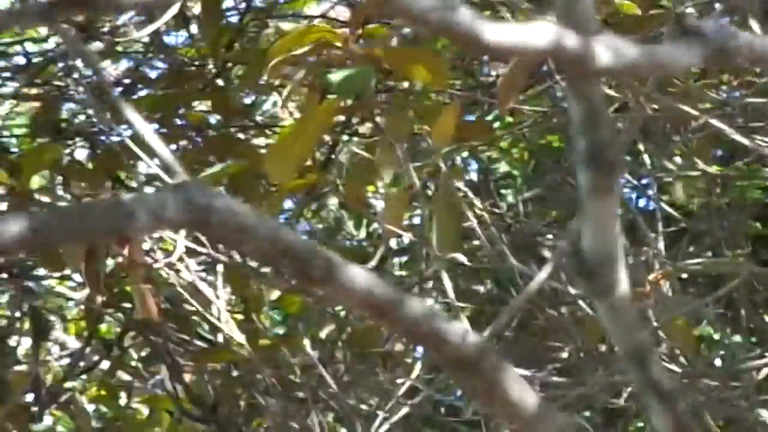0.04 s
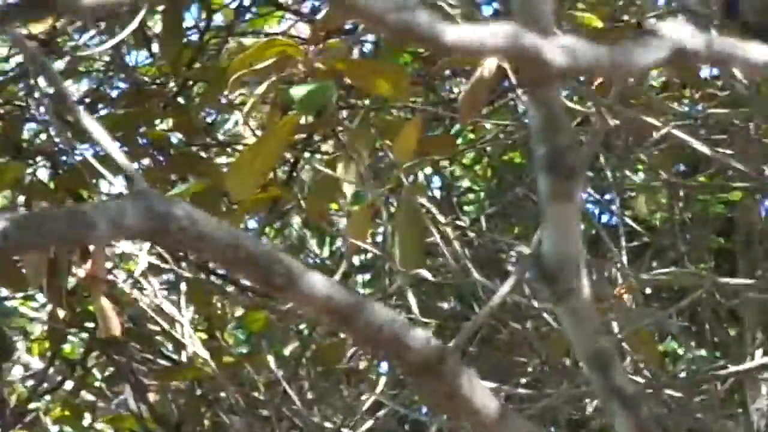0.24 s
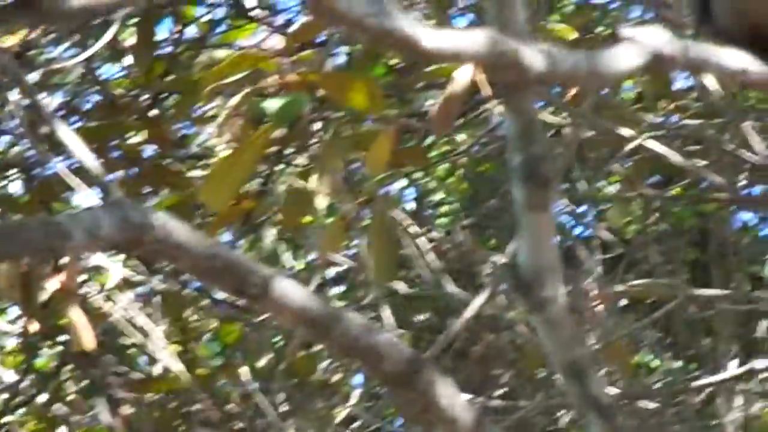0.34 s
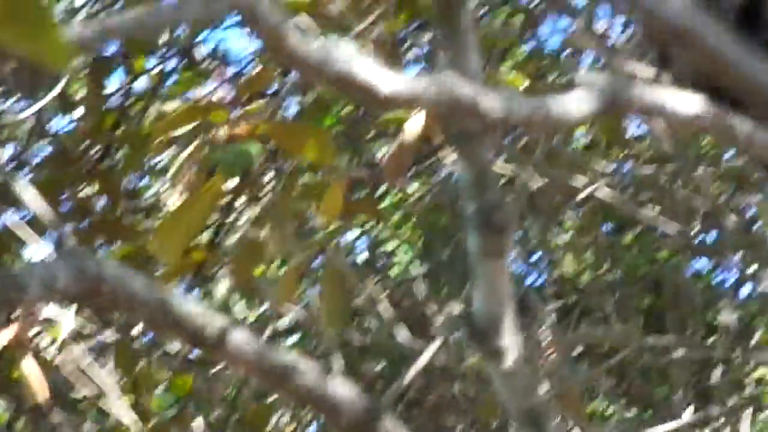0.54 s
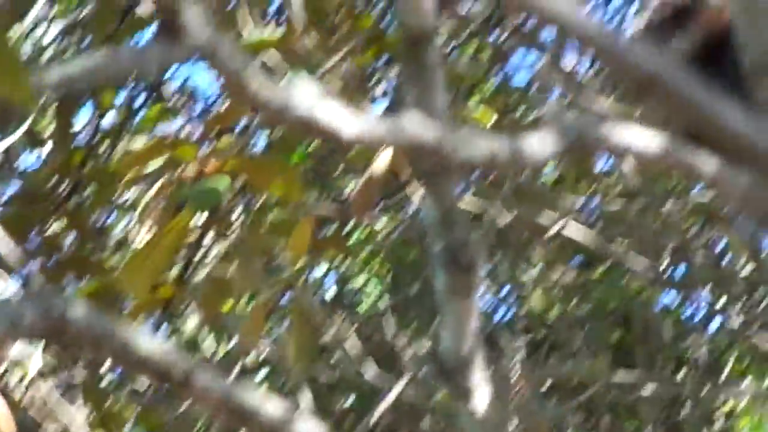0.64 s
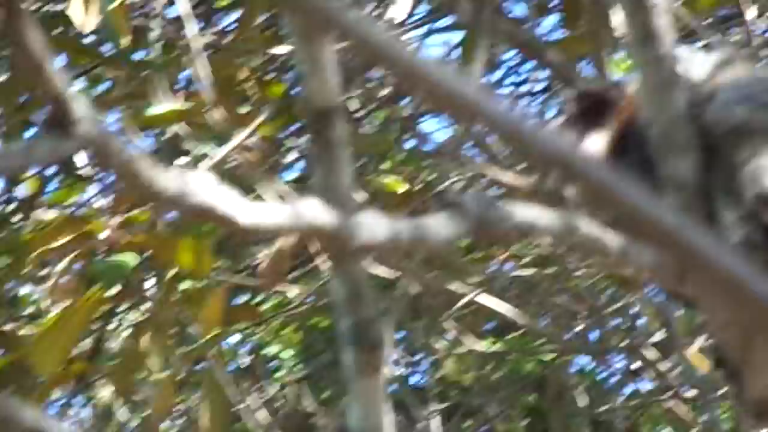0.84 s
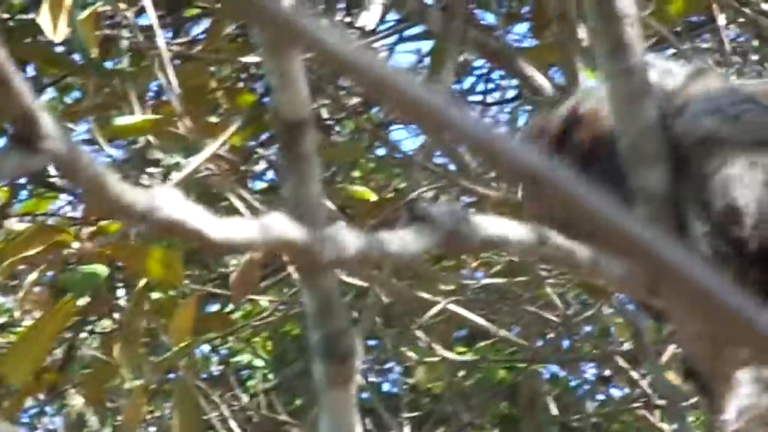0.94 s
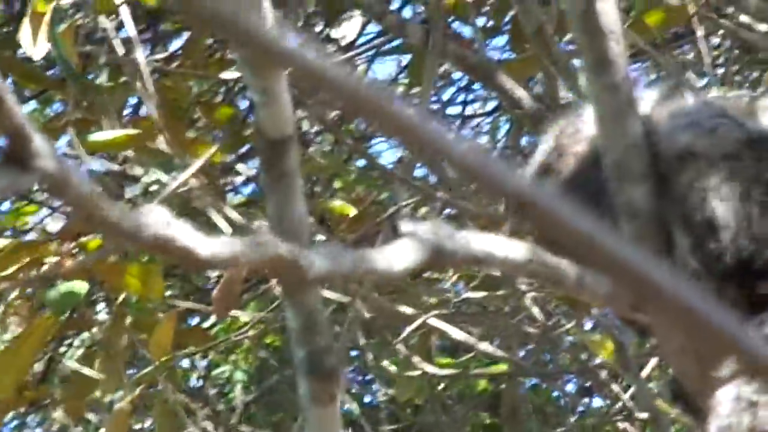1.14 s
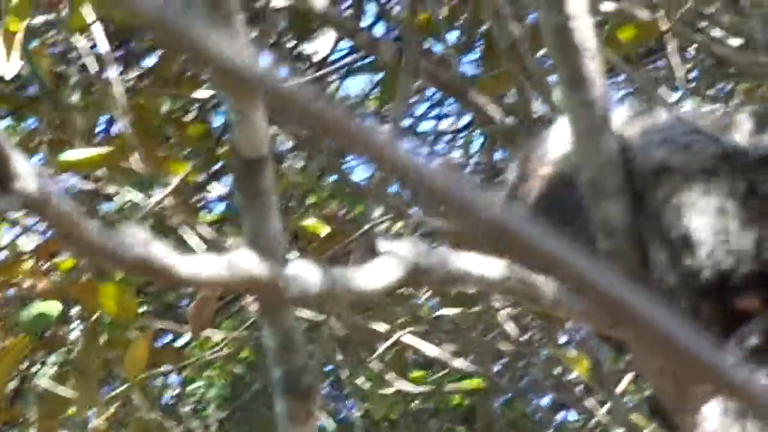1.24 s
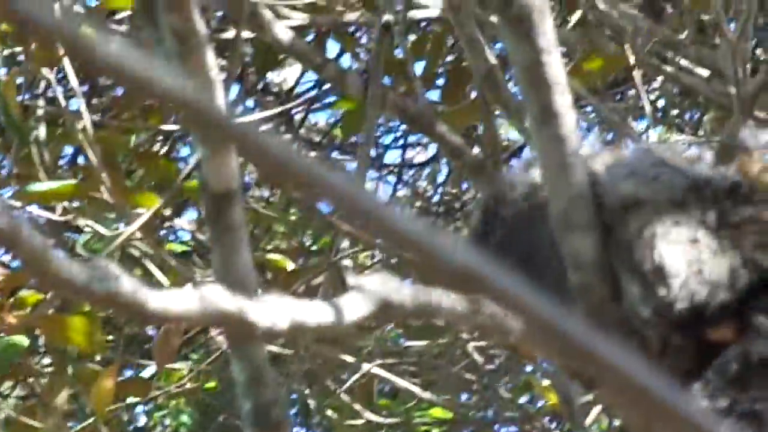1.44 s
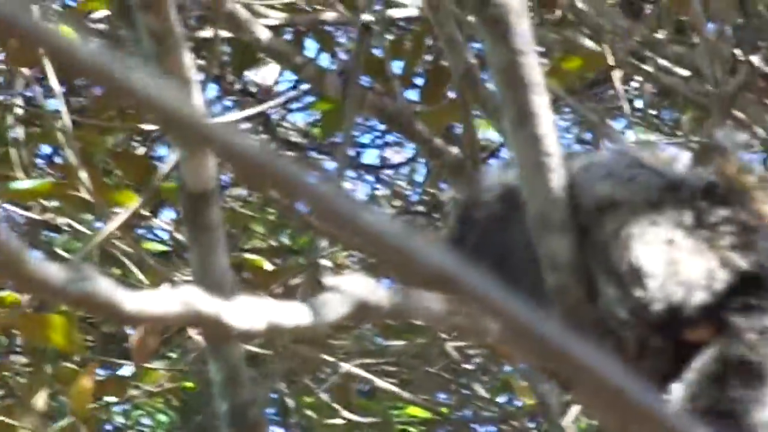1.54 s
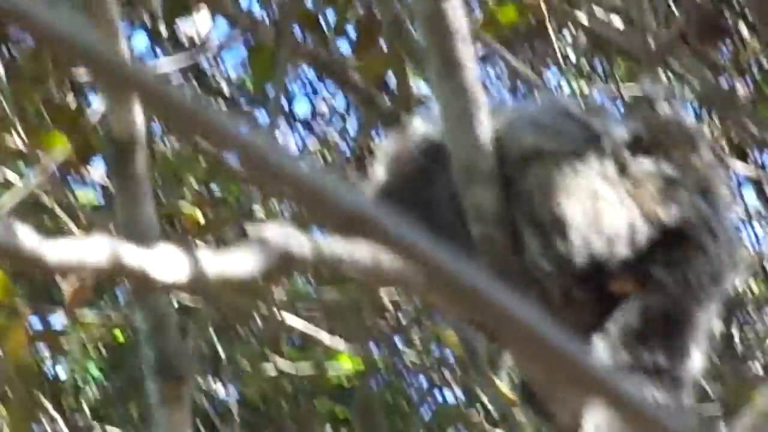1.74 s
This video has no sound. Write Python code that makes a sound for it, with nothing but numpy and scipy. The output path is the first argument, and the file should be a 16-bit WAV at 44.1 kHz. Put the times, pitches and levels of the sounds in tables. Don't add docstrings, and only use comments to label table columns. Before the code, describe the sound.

Two very short, sharp falling chirps from a small monkey in a tree, over quiet hiss

```python
import sys
import numpy as np
from scipy import signal
from scipy.fft import rfft, irfft
from scipy.io import wavfile
from scipy.ndimage import uniform_filter1d

SR = 44100
rng = np.random.default_rng(int(sys.argv[2]) if len(sys.argv) > 2 else 0)


def volts(x):
    e = np.asarray(x, float) / 20
    return 10 ** e


def master_out(mix):
    frames = np.transpose(np.atleast_2d(mix))
    ceiling = np.clip(frames, -1, 1)
    pcm = np.round(ceiling * 32767).astype(np.int16)
    wavfile.write(sys.argv[1], SR, pcm)


N = 79380
TIME = np.arange(N) / SR
BIN_HZ = np.arange(N // 2 + 1) * SR / N


def rms_one(x):
    return x / np.sqrt(np.mean(x ** 2) + 1e-20)


def at_hz(points, hz):
    point_hz, point_db = np.transpose(points)
    return np.interp(np.log(hz + 1), np.log(point_hz), point_db)


def drift(rate_hz):
    r = np.exp(-2 * np.pi * rate_hz / SR)
    slow = signal.lfilter([1], [1, -2 * r, r * r], rng.standard_normal(N + SR))
    return rms_one(slow[SR:])


def resonate(x, hz, width_hz):
    r = np.exp(-np.pi * width_hz / SR)
    zeros = np.array([1, 0, -1]) * (1 - r * r) / 2
    return signal.lfilter(zeros, [1, -2 * r * np.cos(2 * np.pi * hz / SR), r * r], x)


def resonate_twice(x, hz, width_hz):
    return resonate(resonate(x, hz, width_hz), hz, width_hz)


def ringing_noise(hz, width_hz):
    return rms_one(resonate_twice(rng.standard_normal(N), hz, width_hz))


def swell(centre_s, length_s):
    return np.exp(-((TIME - centre_s) / length_s) ** 2)


# f/Hz, level/dB per Hz
FLOOR_SPECTRUM = [(26, -23), (45, -9.5), (108, -10), (870, -1), (959, -5.5), (1350, -5), (4430, -13.5),
                  (12600, -16), (14900, -16)]


def hiss_and_rumble():
    level_db, flicker_db = -55.5, -0.01
    spectrum = rfft(rng.standard_normal(N)) * volts(at_hz(FLOOR_SPECTRUM, BIN_HZ))
    place = np.clip(2 * np.log2(BIN_HZ / 20 + 1e-9), 0, 19)
    out = 0
    for k in range(20):
        band = np.clip(1 - abs(place - k), 0, 1)
        out = out + irfft(spectrum * band, N) * volts(flicker_db * drift(18))
    return volts(level_db) * rms_one(out)


# f/Hz, bandwidth/Hz, level/dB, flicker/dB
HUM_MODES = [
    (550, 165, -72.5, -2.5),
    (734, 230, -81, 3.5),
    (900, 170, -94.5, 4),
    (1397, 116, -67, 1),
]


def hum():
    out = 0
    for hz, width_hz, db, flicker_db in HUM_MODES:
        out = out + volts(db + flicker_db * drift(15)) * ringing_noise(hz, width_hz)
    return out


# t/s, length/s, f/Hz, level/dB
HUM_SWELLS = [(0.068, 0.049, 1390, -54.5), (.03, 0.028, 1284, -58), (0.09, 0.15, 550, -65),
              (0.13, 0.011, 680, -58.5), (.42, 0.021, 1397, -73.5), (0.467, 0.057, 540, -62.5),
              (0.662, 0.027, 562, -60.5), (1.423, 0.049, 900, -58), (1.596, .015, 913, -58)]


def hum_swells():
    width_hz = 62
    return sum(volts(db) * swell(s, length_s) * ringing_noise(hz, width_hz)
               for s, length_s, hz, db in HUM_SWELLS)


# f/Hz, rms level/dB
WHINE_TONES = [
    (12258, -71.5),
    (12290, -81.5),
]


def whine():
    out = 0
    for hz, db in WHINE_TONES:
        level = volts(db - 2.5 + 3 * drift(12))
        out = out + level * np.sqrt(2) * np.sin(2 * np.pi * hz * TIME)
    return out


# t/s, level of a patch/dB, number of patches
SIDE_PATCHES = [(.04, -73, 3), (.18, -71, 2), (.215, -70, 0), (.275, -72, 9), (.852, -74, 1), (.9, -67, 1),
                (1.038, -72, 2), (1.085, -84, 6), (1.2, -73, 2), (1.457, -73, 3)]


def side_patches():
    length_s, width_hz = .016, 1500
    noise, out = rfft(rng.standard_normal(N)), 0
    for s, db, patches in SIDE_PATCHES:
        if patches == 0:
            bands = [0]
        elif patches < 6:
            bands = 3 + rng.permutation(7)[:patches]
        else:
            bands = np.arange(10)
        patch = rms_one(irfft(noise * np.isin(BIN_HZ // width_hz, bands), N))
        envelope = np.exp(-((TIME - s) / length_s) ** 4)
        out = out + volts(db) * np.sqrt(max(patches, 1)) * envelope * patch
    return out


# start t/s, end t/s, low f/Hz, high f/Hz
HISS_GAPS = [
    (.2036, .2062, 2500, 13600),
    (.2055, .2088, 2500, 8500),
    (.208, .2128, 2500, 6800),
]


def thin_before_attack(x):
    for start, end, low_hz, high_hz in HISS_GAPS:
        gate = uniform_filter1d(1. * ((TIME > start) & (TIME < end)), size=20)
        band = (BIN_HZ > low_hz) & (BIN_HZ < high_hz)
        x = x - gate * irfft(rfft(x) * band, N)
    return x


# t/s, f/Hz, level/dB, overtone level/dB
FIRST_CHIRP = [(.2065, 15600, -55, -80), (.2102, 12000, -38, -80), (.2116, 10600, -24, -80),
               (.2142, 8500, -31, -55), (.2168, 7050, -18, -33), (.2181, 6300, -28, -19),
               (.2215, 4850, -32, -38), (.2258, 2850, -36, -50), (.2286, 2600, -28, -50)]
# t/s, f/Hz, level/dB, overtone level/dB
SECOND_CHIRP = [(.612, 9900, -60, -80), (.619, 10850, -49, -80), (.625, 11420, -43, -80),
                (.628, 10800, -45, -80), (.631, 9050, -43, -70), (.6335, 7250, -43, -48),
                (.6385, 4150, -40, -47), (.6408, 2700, -46, -54), (.643, 2380, -39, -54)]


def chirp(rows):
    dive_hz_per_s, release_s, third_db, wobble_db = 450000, .0008, -1, 1.5
    s, hz, db, over_db = np.transpose(rows)
    after_s = np.maximum(TIME - s[-1], 0)
    pitch = np.maximum(np.interp(TIME, s, hz) - dive_hz_per_s * after_s, 600)
    pitch = uniform_filter1d(pitch, size=40)
    phase = 2 * np.pi * np.cumsum(pitch) / SR
    gate = (TIME > s[0]) * np.exp(-after_s / release_s) * volts(wobble_db * drift(510))
    over = volts(np.interp(TIME, s, over_db))
    first = volts(np.interp(TIME, s, db)) * np.sin(phase)
    second = over * (2 * pitch < SR / 2.2) * np.sin(2 * phase)
    third = over * volts(third_db) * (3 * pitch < SR / 2.2) * np.sin(3 * phase)
    return gate * (first + second + third)


# t/s, level/dB
THROAT_PUFFS = [
    (0.231, -50),
    (0.646, -48),
]


def puffs():
    length_s = 0.0085
    band = signal.butter(2, [450, 2050], "band", fs=SR, output="sos")
    noise = rms_one(signal.sosfilt(band, rng.standard_normal(N)))
    return noise * sum(volts(db) * swell(s, length_s) for s, db in THROAT_PUFFS)


# delay t/s, level/dB
BOUGH_ECHOES = [
    (.0075, -2),
    (.0148, -12),
    (.0275, -18),
]


def boughs(x):
    hollow = resonate_twice(x, 2600, 900)
    samples = np.arange(N)
    return sum(volts(db) * np.interp(samples - s * SR, samples, hollow) for s, db in BOUGH_ECHOES)


# f/Hz, level/dB
LEAF_SPECTRUM = [(500, 6.5), (2500, -4), (4500, -2), (7200, 1), (9400, 0.5), (11200, 0.5), (12800, 3),
                 (15000, 7)]


def leaves(x):
    level_db, rise_s, density_per_s = -3, 0.00058, 840
    near_t60_s, far_t60_s, far_db = 0.078, .26, -14
    t = np.arange(SR // 2) / SR
    glints = rng.random(len(t)) < density_per_s / SR
    sparse = rng.standard_normal(len(t)) * (0.69 + glints)
    decay = volts(-60 * t / near_t60_s) + volts(far_db - 60 * t / far_t60_s)
    cloud = sparse * decay * (1 - np.exp(-t / rise_s))
    cloud = cloud / np.sqrt(np.sum(cloud ** 2))
    colour = volts(level_db + at_hz(LEAF_SPECTRUM, np.arange(N + 1) * SR / (2 * N)))
    return irfft(rfft(x, 2 * N) * rfft(cloud, 2 * N) * colour)[:N]


# t/s, length/s, f/Hz, bandwidth/Hz, level/dB
BIRD_NOTES = [
    (.897, .016, 6300, 700, -64),
    (.925, .018, 6050, 500, -69),
]


def far_bird():
    return sum(volts(db) * swell(s, length_s) * ringing_noise(hz, width_hz)
               for s, length_s, hz, width_hz, db in BIRD_NOTES)


def scene():
    background = thin_before_attack(hiss_and_rumble() + hum() + hum_swells() + whine())
    call = chirp(FIRST_CHIRP) + chirp(SECOND_CHIRP) + puffs()
    mid = background + call + boughs(call) + leaves(call) + far_bird()
    side = side_patches()
    return np.array([mid + side, mid - side])


def roll_off(x):
    return signal.sosfilt(signal.butter(12, 16120, fs=SR, output="sos"), x)


def record(dry):
    cutoff_hz, offset = 15020, -.0005
    mix = irfft(rfft(dry) * (BIN_HZ < cutoff_hz), N) + offset
    return roll_off(mix)


dry = scene()
out = record(dry)
master_out(out)
```